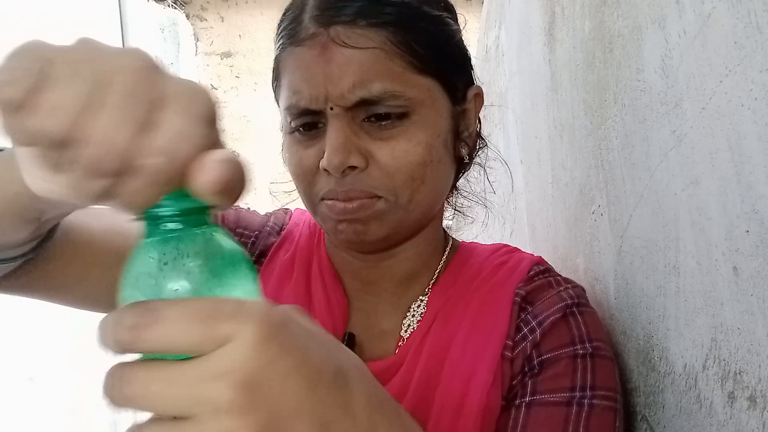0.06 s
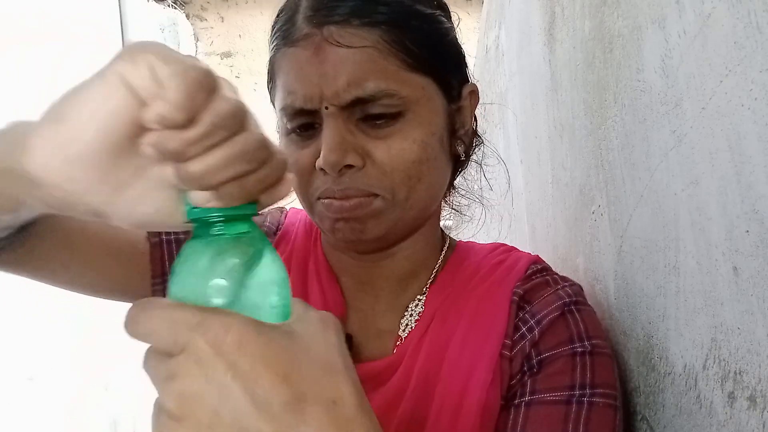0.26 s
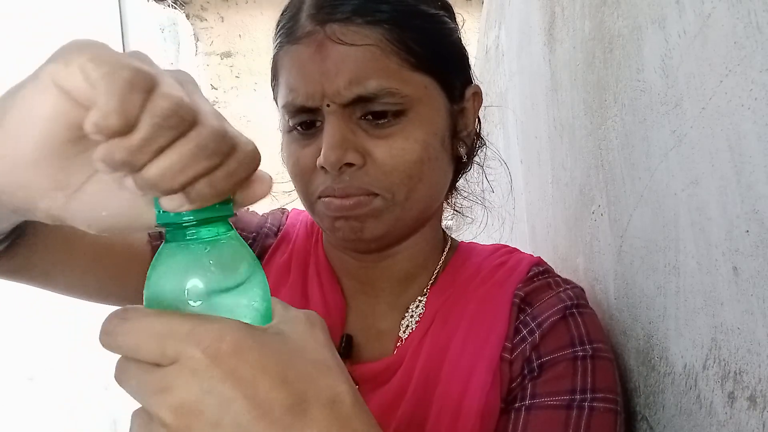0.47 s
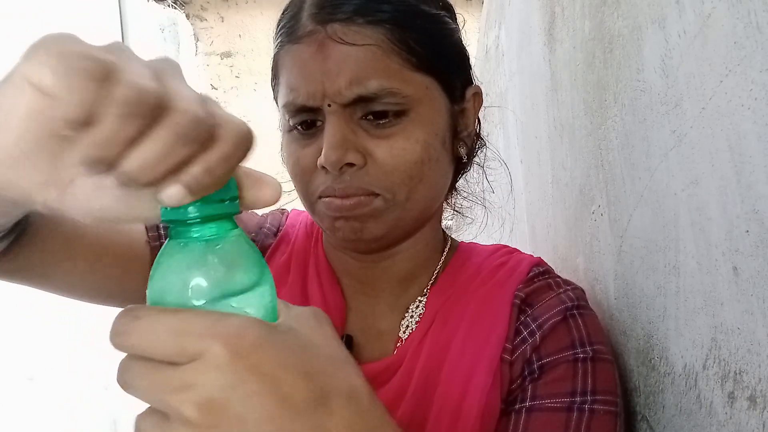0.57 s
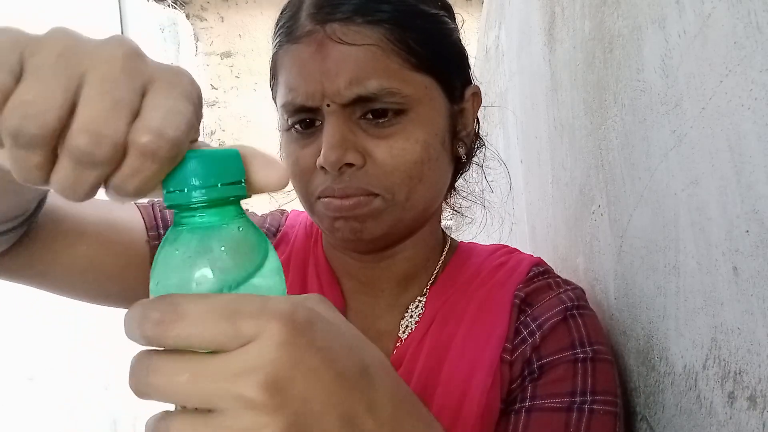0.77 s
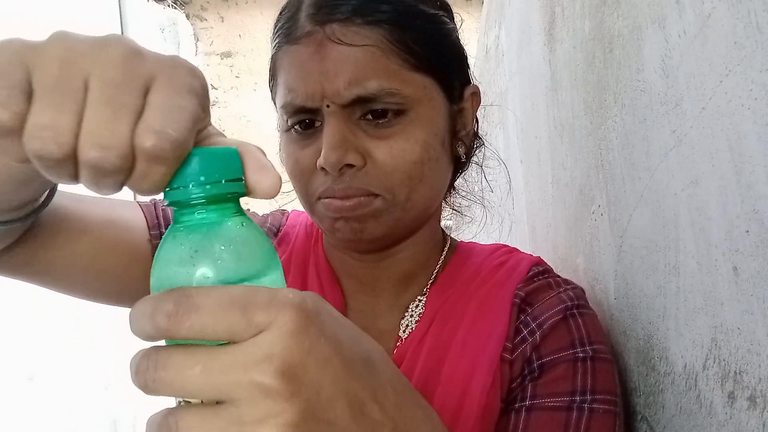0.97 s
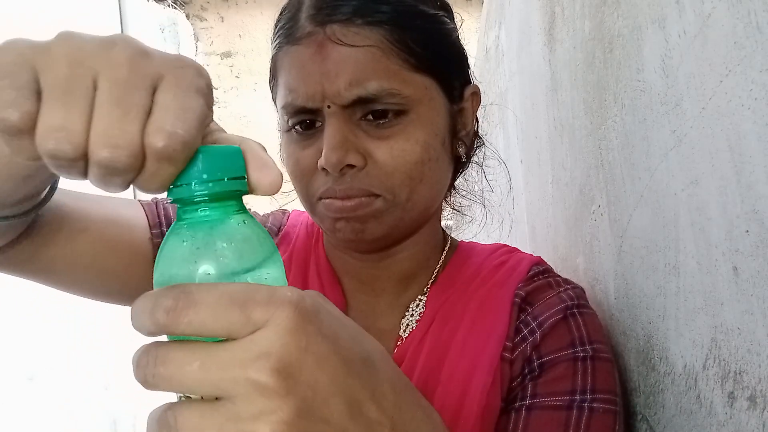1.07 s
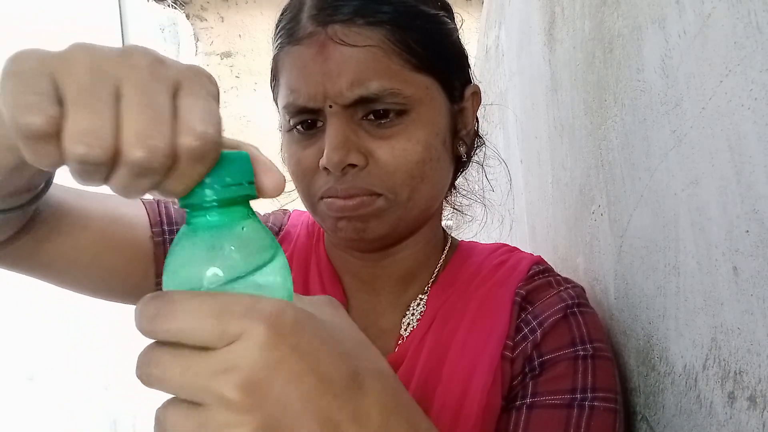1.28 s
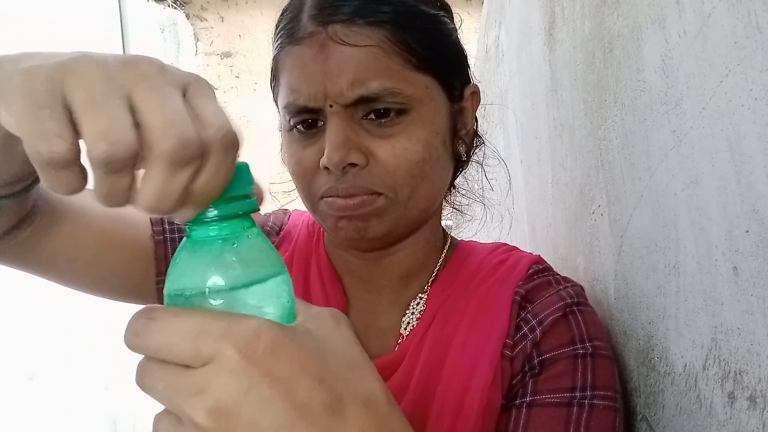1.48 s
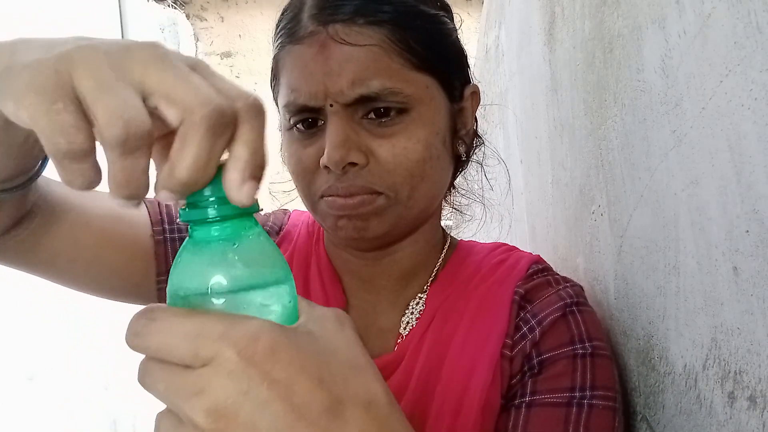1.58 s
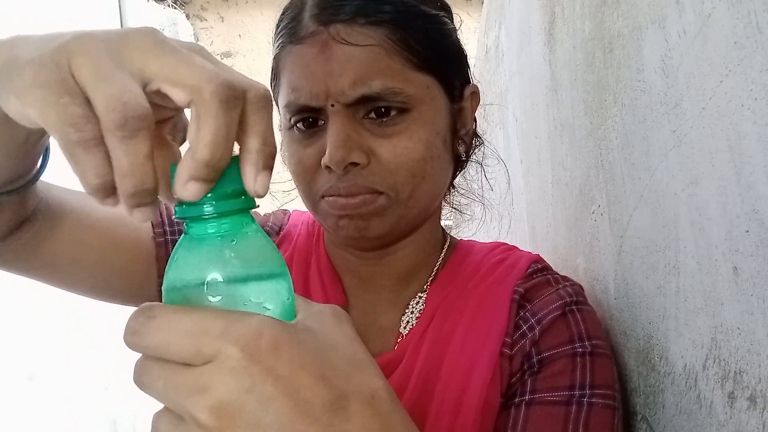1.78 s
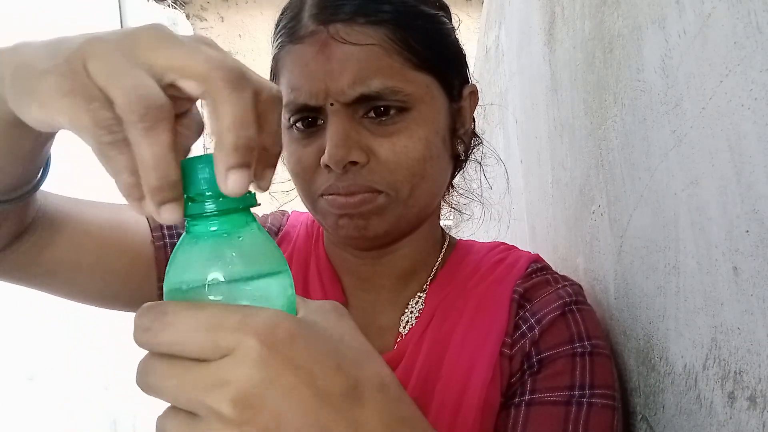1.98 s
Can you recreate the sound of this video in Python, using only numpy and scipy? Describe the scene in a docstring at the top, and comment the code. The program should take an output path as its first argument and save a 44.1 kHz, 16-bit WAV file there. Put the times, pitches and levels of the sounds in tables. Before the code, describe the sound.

A small plastic bottle of fizzy drink is opened, close and dry, beside a wall. Thin gas hiss leaks at first, with a crack at 0.15 seconds, then a loud burst at 0.2 ending in a quick falling whistle and another crack at 0.3. The hiss fades into faint outdoor air and low rumble. Plastic snaps come at 1.36, 1.51 and, loudest, 1.59, then a slight scrape and tiny clicks until 2.05.

```python
"""The cap of a small plastic bottle of fizzy drink is twisted off, close to the microphone, beside a wall.
Over faint outdoor air and a low rumble, gas leaks through the thread as coloured noise, and a crack is heard.
The gas bursts out as rushing noise, ending in a falling whistle, a wavering sine, as the pressure goes.
After faint rasps and thin tones the cap's ring clicks and snaps free: puffs of noise with ringing sines.
Two of these cracks shake the bottle's wall; faint scrapes of the thread and small clicks follow."""
import sys
import numpy as np
from scipy import signal
from scipy.fft import rfft, irfft, next_fast_len
from scipy.io import wavfile
from scipy.ndimage import map_coordinates

SR = 44100
rng = np.random.default_rng(int(sys.argv[2]) if len(sys.argv) > 2 else 0)


def master(y):
    """Save y as 16-bit WAV."""
    cut = np.clip(np.atleast_2d(y).T, -1, 1)
    pcm = np.round(cut * 32767)  # scale
    wavfile.write(sys.argv[1], SR, pcm.astype(np.int16))


N = 90404


def amp(db):
    """Decibels to gain."""
    return 10 ** (np.asarray(db) / 20)


def unit(x):
    """Scale to an average strength (rms) of 1."""
    return x / np.sqrt(np.mean(x ** 2) + 1e-20)


def along(points, hz):
    """Read a curve of (Hz, value) points, joined by straight lines on a log frequency axis."""
    point_hz, values = np.transpose(points)
    return np.interp(np.log(hz + 1), np.log(point_hz + 1), values)


def clock():
    """Time of each sample in seconds."""
    return np.arange(N) / SR


def curves(rows):
    """One value per sample for each column after the time."""
    seconds, *columns = np.transpose(rows)
    return [np.interp(clock(), seconds, column) for column in columns]


def during(rows):
    """True between a curve's first and last point."""
    return (clock() > rows[0][0]) & (clock() < rows[-1][0])


def bell(x, centre, width):
    """A smooth hump of height 1; width is its standard deviation."""
    return np.exp(-.5 * ((x - centre) / width) ** 2)


def above(hz, edge_hz):
    """Steep step from 0 below the edge to 1 above it."""
    return 1 - 1 / (1 + (hz / edge_hz) ** 8)


def wobble(rate):
    """A smooth random curve through rate random points a second."""
    return map_coordinates(rng.standard_normal(N // 8), [clock() * rate], mode="wrap")


def filtered(x, gain):
    """x times a gain that depends on frequency."""
    size = next_fast_len(len(x) + 8192)
    spectrum = rfft(x, size) * gain(np.fft.rfftfreq(size, 1 / SR))
    return irfft(spectrum, size)[:len(x)]


def causal(x, colour_db, size=2048):
    """Colour a hit without smearing it backwards in time (a minimum-phase filter)."""
    cepstrum = irfft(np.log(amp(colour_db(np.fft.rfftfreq(size, 1 / SR)))))
    # fold the time-reversed half onto the forward half
    cepstrum[1:size // 2] *= 2
    cepstrum[size // 2 + 1:] = 0
    response = irfft(np.exp(rfft(cepstrum)))
    return signal.fftconvolve(x, response)[:len(x)]


def noise(gain):
    """Coloured noise of rms 1."""
    return unit(filtered(rng.standard_normal(N), gain))


def rush(colour):
    """Noise whose spectrum follows (Hz, relative dB) points."""
    return noise(lambda hz: amp(along(colour, hz)))


def jet(colour, depth):
    """Turbulence heard through the resonances under the cap; depth scales their peaks and dips."""
    # Peaks and dips of the space under the cap.
    # Each row: centre in Hz, width in Hz, height in dB before depth scales it.
    cavity = [(2330, 220, 9.5), (3100, 61, 3.5), (3326, 230, 5), (4480, 220, 5), (6560, 67, 6.5),
              (6957, 100, 5.5), (8240, 120, 3.5), (8360, 220, 4), (8830, 50, 3.5), (9280, 69, 2),
              (2480, 630, -2.5), (4300, 250, -8), (7820, 150, -4)]

    def gain(hz):
        resonances_db = sum(db * bell(hz, centre, width / 2) for centre, width, db in cavity)
        return amp(along(colour, hz) + depth * resonances_db)
    return noise(gain)


def leak():
    """Gas seeping through the thread hisses thinly, with a hollow hum through the closed seal at first."""
    # How loud the hiss is. Each row: time in seconds, level in dB.
    leak_level = [(0, -51), (.07, -49), (.12, -51.5), (.18, -56), (.33, -50), (.45, -53), (.53, -60),
                  (.62, -71.5), (.8, -79), (1.2, -84), (1.7, -93.5)]
    # Colour of the hiss. Each row: frequency in Hz, relative level in dB.
    leak_colour = [(600, -19.5), (1200, -21.5), (1900, -2.5), (4000, -1.5), (6300, -5.5), (8500, 1.5),
                   (10200, -15), (12000, -24), (15000, -43.5)]
    # How loud the hum of the squeezed gas is. Each row: time in seconds, level in dB.
    squeeze = [(0, -69), (.07, -66), (.13, -67), (.19, -75), (.25, -100)]
    squeeze_hz, squeeze_width_hz = 806, 150
    level_db, = curves(leak_level)
    squeeze_db, = curves(squeeze)
    hum = noise(lambda hz: bell(hz, squeeze_hz, squeeze_width_hz))
    hollow = during(squeeze) * amp(squeeze_db) * hum
    hiss = amp(level_db + .7 * wobble(160)) * jet(leak_colour, depth=0.3)
    return hiss + hollow


def room(x):
    """A burst of quick reflections from the near wall, plus a short tail that fades at each pitch's own rate."""
    # How long the tail takes to fall by 60 dB. Each row: frequency in Hz, time in seconds.
    fade_times = [(200, 0.19), (900, 0.23), (1800, 0.34), (4000, .19), (9000, 0.097), (15000, 0.095)]
    # Colour of the tail at its start. Each row: frequency in Hz, relative level in dB.
    room_colour = [(300, 1.5), (900, 6), (1700, -4), (3500, -2), (6000, 1.5), (8500, 1.5), (14000, -0.5)]
    tail_db, wall_db, wall_s = -12, -14, .012
    hz, t, grid = signal.stft(rng.standard_normal(SR // 3), SR, nperseg=256)
    start_db = along(room_colour, hz)[:, None]
    fade_db = 60 * t / along(fade_times, hz)[:, None]
    tail = signal.istft(grid * amp(start_db - fade_db), SR, nperseg=256)[1]
    early = rng.standard_normal(len(tail)) * bell(np.arange(len(tail)) / SR, wall_s, wall_s / 2)
    answer = amp(tail_db) * tail / np.linalg.norm(tail)
    answer = answer + amp(wall_db) * early / np.linalg.norm(early)
    return signal.fftconvolve(x, answer)[:len(x)]


def background():
    """Outdoor air and an uneven low rumble as coloured noise, with a few faint rasps and narrow-band squeaks."""
    # Colour of the air. Each row: frequency in Hz, relative level in dB.
    air_colour = [(25, -22.5), (60, -2.5), (170, 2), (280, -7.5), (450, -1), (800, -6.5), (1600, -10),
                  (2500, -16), (5000, -24.5), (8500, -29.5), (11000, -37), (15000, -42)]
    # How loud the air is. Each row: time in seconds, level in dB.
    air_level = [(0, -65.5), (.4, -72.5), (.7, -68.5), (1.0, -67), (1.3, -68.5), (1.5, -68.5), (1.85, -72),
                 (2.05, -67)]
    # How loud the rumble is. Each row: time in seconds, level in dB.
    rumble_level = [(0, -52.5), (.07, -47.5), (.12, -55.5), (.27, -66.5), (.4, -62), (.48, -64.5),
                    (.63, -64.5), (.69, -85), (.82, -65), (.89, -86), (1.06, -68.5), (1.24, -73),
                    (1.31, -59), (1.37, -74), (2.05, -77)]
    # Colour of the rumble. Each row: frequency in Hz, relative level in dB.
    rumble_colour = [(20, -30.5), (45, -20.5), (68, -7.5), (90, 4), (115, -15.5), (170, -21), (300, -39),
                     (900, -71.5)]
    # Squeaks. Each row: middle in seconds, half length in seconds, pitch in Hz, width in Hz, level in dB.
    squeak_rows = [(1.15, .03, 5400, 220, -82), (1.79, .04, 5250, 230, -77), (1.94, .08, 5100, 230, -83),
                   (1.72, .04, 8950, 400, -78), (2.01, .035, 1640, 110, -70)]
    rumble_db, = curves(rumble_level)
    air_db, = curves(air_level)
    squeaks = np.zeros(N)
    for s, half, centre, width, db in squeak_rows:
        squeaks += amp(db) * bell(clock(), s, half) * noise(lambda hz: bell(hz, centre, width))
    air = amp(air_db) * rush(air_colour)
    rumble = amp(rumble_db) * rush(rumble_colour)
    return air + rumble + squeaks + rasps()


def clicks():
    """Each crack is a puff of noise and a short ring of the plastic, coloured by where it gives way; the room answers."""
    # Cracks of cap and ring. Each row: start in seconds, level in dB, edge in Hz below which it is weakened,
    # frequency in Hz that is lifted or dipped, by how many dB, extra treble in dB, extra sheen in dB.
    click_rows = [(0.1493, -28.5, 1350, 2780, 4, 0.5, 3), (0.2984, -17.5, 1580, 2400, 8.5, 0.5, 4.5),
                  (1.3613, -26, 900, 2000, 6.5, 0.5, -5), (1.3617, -20.5, 1100, 2940, 5.5, 1, -16),
                  (1.5137, -21.5, 1550, 4650, 4.5, -7.5, 8), (1.516, -27.5, 1480, 3520, -3, -3, 7),
                  (1.592, -25, 1206, 3230, 2, 2.5, 5), (1.5931, -10, 893, 1546, 9, 0, 2),
                  (1.5959, -22, 1520, 6900, 9.5, 0.5, 2.5), (1.767, -66, 7010, 9200, 22, -2, 3),
                  (1.7933, -60, 1400, 1750, 25, -10, -3), (2.0378, -52, 1484, 3300, 10, -1, 9),
                  (2.0410, -48, 1490, 1760, 28, -5, 6)]
    # Ring of the cap and neck. Each row: pitch in Hz, relative level in dB.
    plastic = [(1400, -11.5), (1690, -6.5), (2130, -7), (2520, -9), (2790, -3), (3250, -3), (4000, -7),
               (4600, -8), (5370, -9.5), (5860, -10), (6920, -7), (8080, -8.5), (8580, -7.5), (8880, -8),
               (9640, -15)]
    # Colour of the puff of noise. Each row: frequency in Hz, relative level in dB.
    crack_colour = [(200, -30.5), (750, -19.5), (1120, -18), (1600, -0.5), (3200, 3), (4800, -2),
                    (6300, -7.5), (8600, 4.5), (10300, -13), (12500, -19.5), (15500, -38.5)]
    ring_db, ring_t60_s = -8, .015  # t60: time to fall by 60 dB
    crack_db, crack_t60_s = -8.5, 0.016
    attack_s = 0.00024
    # the room's answer comes mostly from the crack, so it is noisy rather than ringing
    ring_to_room_db, crack_to_room_db = -6, 3
    low_cut_floor_db, bump_octaves = -15, .18
    treble_hz, sheen_hz = 6200, 10310
    out, t = np.zeros(N + SR), np.arange(SR // 3) / SR
    onset = 1 - np.exp(-t / attack_s)
    for s, db, low_hz, bump_hz, bump_db, treble_db, sheen_db in click_rows:
        def tone(hz):
            low_cut = low_cut_floor_db * (1 - above(hz, low_hz))
            return low_cut + treble_db * above(hz, treble_hz) + sheen_db * above(hz, sheen_hz)

        def bump(hz):
            return bump_db * bell(np.log2((hz + 1) / bump_hz), 0, bump_octaves)

        ring = np.zeros(len(t))
        for hz, level in plastic:
            # each pitch varies a little in strength and starts anywhere in its cycle
            strength = amp(level + rng.normal(0, 1))
            ring += strength * np.sin(2 * np.pi * (hz * t + rng.random()))
        ring = amp(ring_db - 60 * t / ring_t60_s) * onset * ring
        crack = amp(crack_db - 60 * t / crack_t60_s) * onset * rush(crack_colour)[:len(t)]
        to_room = amp(ring_to_room_db) * ring + amp(crack_to_room_db) * crack
        hit = causal(ring + crack, bump) + room(to_room)
        out[round(s * SR):][:len(t)] += amp(db) * causal(hit, tone)
    return out[:N]


def burst():
    """The gas rushes out in a smooth roar; the jet gets brighter and fuller as the gap widens."""
    # Gas flow once the seal opens. Each row: time in seconds, level in dB.
    flow = [(.186, -60), (.192, -44), (.199, -32), (.207, -19.5), (.222, -17), (.24, -14.5), (.254, -15),
            (.268, -20), (.279, -25.5), (.29, -39.5), (.31, -51.5), (.34, -56)]
    # The jet through the narrow gap. Each row: frequency in Hz, relative level in dB.
    narrow_colour = [(200, -41.5), (1000, -30), (1450, -21.5), (2000, -5), (2600, -10), (3150, 0.5),
                     (3900, -9), (5000, -4.5), (7500, -7.5), (8400, -4), (9600, -8), (10900, -24.5),
                     (13800, -37.5), (15400, -29)]
    # The jet with the gap wide. Each row: frequency in Hz, relative level in dB.
    wide_colour = [(150, -51), (450, -26.5), (1350, -23), (1800, -11.5), (2900, -15.5), (4100, -13.5),
                   (5000, -11), (6100, -12.5), (6800, -7.5), (7600, -9), (8300, -3), (9300, -6.5),
                   (9800, -14.5), (10400, -16.5), (10900, -30), (13800, -38.5), (15400, -32)]
    opens_s, opening_s = .222, .005  # when the gap widens, and how fast
    flutter_per_s, flutter_db = 1500, 0.14  # a barely audible flutter
    level_db, = curves(flow)
    wide = .5 + .5 * np.tanh((clock() - opens_s) / opening_s)
    gas = np.sqrt(1 - wide) * jet(narrow_colour, depth=.7)
    gas = gas + np.sqrt(wide) * jet(wide_colour, depth=1.05)
    return during(flow) * amp(level_db + flutter_db * wobble(flutter_per_s)) * gas


def whistle():
    """A tone, roughened by fast random shifts of pitch and level, slides down as the pressure goes."""
    # The falling whistle. Each row: time in seconds, pitch in Hz, level in dB.
    slide = [(.248, 7400, -45), (.257, 6600, -26), (.263, 5900, -32), (.269, 5400, -25), (.279, 3850, -30),
             (.287, 2600, -35), (.294, 2200, -54)]
    wander_hz = 365
    hz, level_db = curves(slide)
    phase = 2 * np.pi * np.cumsum(hz + wander_hz * wobble(2200)) / SR
    tone = np.sqrt(2) * np.sin(phase)
    return during(slide) * amp(level_db + 1.8 * wobble(900)) * tone


def rasps():
    """Narrow puffs of noise that start quickly and fade."""
    # Faint rasps. Each row: start in seconds, centre in Hz, width in Hz, level in dB.
    rasp_rows = [(.478, 1220, 191, -59.5), (.885, 1510, 90, -69.5), (1.004, 1200, 179, -60)]
    rise_s, t60_s = 0.0065, 0.46
    out = np.zeros(N)
    for s, centre, width, db in rasp_rows:
        age = np.maximum(clock() - s, 0)
        shape = amp(db - 60 * age / t60_s) * (1 - np.exp(-age / rise_s))
        out += shape * noise(lambda hz: bell(hz, centre, width))
    return out


def peeps():
    """Thin, slightly wavering tones that swell and fade."""
    # Faint whistles. Each row: middle in seconds, half length in seconds, pitch in Hz, level in dB.
    peep_rows = [(.99, .06, 4195, -74), (1.01, .05, 3130, -79), (.95, .018, 8350, -80)]
    wander_hz = 21.9
    out = np.zeros(N)
    for s, half, hz, db in peep_rows:
        swell = amp(db + 2.8 * wobble(61.1)) * bell(clock(), s, half)
        phase = 2 * np.pi * np.cumsum(hz + wander_hz * wobble(190)) / SR
        out += swell * np.sqrt(2) * np.sin(phase)
    return out


def bottle():
    """The bottle's wall, shaken by two of the cracks, gives a short, low ring of fading sines."""
    # Pitches of the wall. Each row: pitch in Hz, relative level in dB, time to fall by 60 dB in seconds.
    wall_tones = [(305, -65, .13), (820, -41.5, 0.055), (956, -47, .07)]
    # Shakes. Each row: start in seconds, level in dB added to that of the pitches.
    jolts = [(1.362, -13.5), (1.5935, 4.5)]
    rise_s = .0015
    out = np.zeros(N)
    for s, db in jolts:
        age = np.maximum(clock() - s, 0)
        ring = sum(amp(level - 60 * age / t60) * np.sin(2 * np.pi * hz * age) for hz, level, t60 in wall_tones)
        out += amp(db) * (1 - np.exp(-age / rise_s)) * ring
    return out


def rubs():
    """The thread rubs as the cap turns: short scrapes of noise, made grainy by a fast uneven level."""
    # Scrapes. Each row: middle in seconds, half length in seconds, level in dB.
    strokes = [(1.659, 0.0168, -53), (2.015, 0.047, -92)]
    # Colour of the scrapes. Each row: frequency in Hz, relative level in dB.
    rub_colour = [(600, -24.5), (1300, -20), (1750, -1), (2300, -11), (3500, -6.5), (5800, -23),
                  (8100, -7.5), (10000, -24), (15000, -50)]
    stroke = sum(amp(db) * bell(clock(), s, half) for s, half, db in strokes)
    grain = unit(rush(rub_colour) * amp(2.5 * wobble(520)))
    return stroke * grain


def scene():
    """Gas, cap and bottle in their surroundings."""
    near = leak() + burst() + whistle() + rubs() + bottle()
    echoed = near + amp(-4.5) * room(near)
    # the clicks bring their own room sound
    return (echoed + clicks() + peeps() + background())[None]


def record(dry):
    """The recorder keeps nothing above its band limit."""
    top_hz, edge_hz = 16100, 400
    return filtered(dry[0], lambda hz: np.clip((top_hz - hz) / edge_hz, 0, 1))[None]


dry = scene()
out = record(dry)
master(out)
```